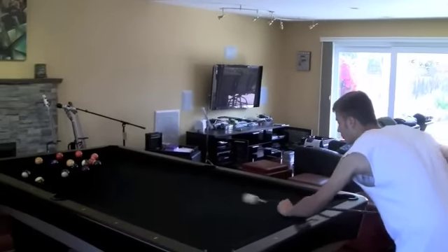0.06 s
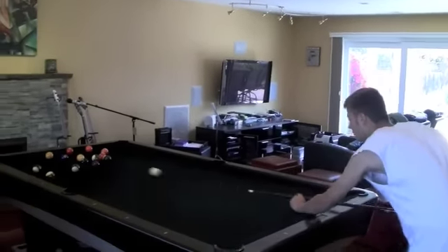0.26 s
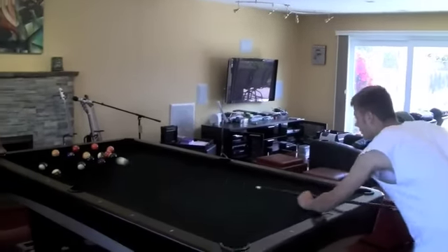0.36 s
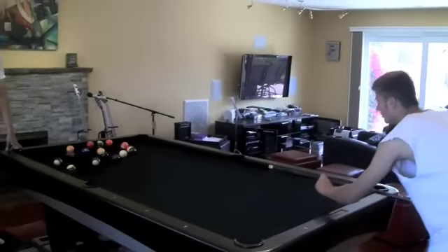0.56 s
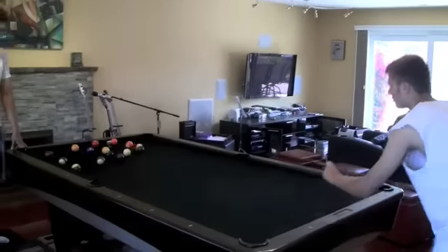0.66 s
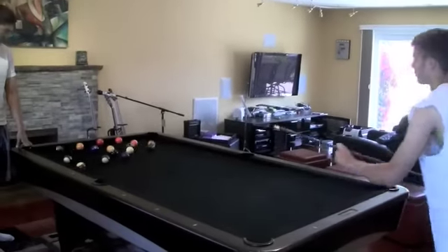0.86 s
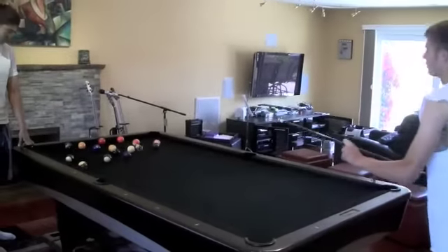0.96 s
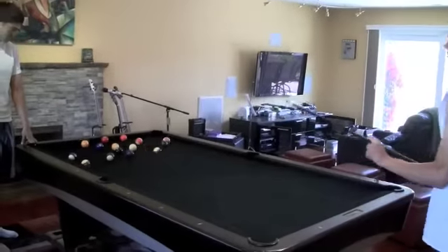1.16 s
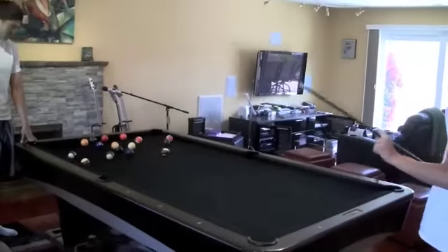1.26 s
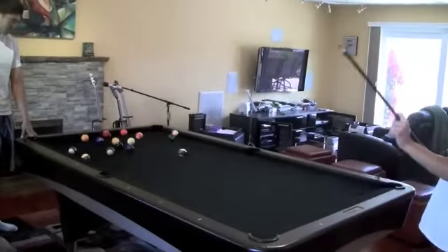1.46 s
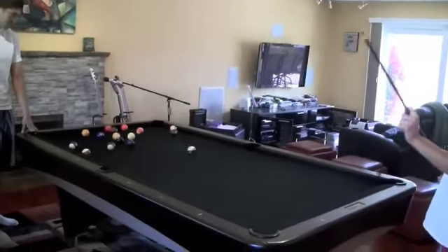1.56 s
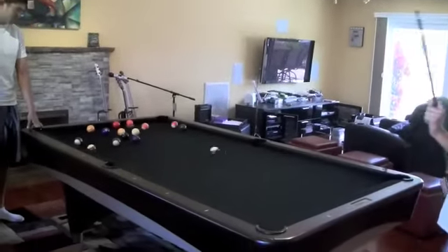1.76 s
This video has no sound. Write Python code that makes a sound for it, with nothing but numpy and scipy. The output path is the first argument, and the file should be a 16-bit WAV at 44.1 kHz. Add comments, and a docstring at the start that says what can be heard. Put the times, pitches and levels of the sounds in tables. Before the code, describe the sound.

A pool break in a reverberant living room, a few metres from the microphone. After faint room tone, a woody cue knock with a short throbbing shaft ring at 0.23 s. Low rolling follows. At 0.59 s a loud, hard crack of balls, with tight clacks thinning out by 0.75 s. Dull cushion thuds fade by 1.1 s; quiet hiss, then a small click at 1.57 s.

```python
"""A knock of wood, a crack of hard balls, dull thuds and one late click, in a lively living room.
A cue drives the white ball up a pool table, a few metres from the microphone.
The cue is a shaped blow, dense noise reflections and shaft modes; balls and cushions are jolted resonances.
Balls rumble over the slate, room tone and hiss lie beneath, and a limiter holds down the loud blows."""
import sys
import numpy as np
from scipy import signal
from scipy.io import wavfile
from scipy.ndimage import uniform_filter1d

SR = 44100
rng = np.random.default_rng(int(sys.argv[2]) if len(sys.argv) > 2 else 0)


def generate_wav(signal):
    """Clip the signal to [-1, 1] and save it as 16-bit WAV at the path in sys.argv[1]."""
    frames = np.transpose(np.atleast_2d(signal))
    scaled = np.clip(frames, -1, 1) * 32767
    pcm = np.round(scaled).astype(np.int16)
    wavfile.write(sys.argv[1], SR, pcm)


def decibels_to_gain(level_db):
    """Convert a level in decibels to a linear amplitude gain (20 dB per decade)."""
    exponent = np.asarray(level_db, float) / 20
    return 10 ** exponent


N = 79380  # length [samples]

# Knock of the tip: (frequency [Hz], level [dB])
TIP_COLOUR = [(60, -41.5), (150, -16), (300, -3), (600, -3), (1000, -2.5), (1500, -5.5), (3000, -14.5),
              (5000, -21.5), (9000, -31), (16000, -50)]
# Bright ticks of the tip and their echo: (time after the blow [ms], level [dB])
TIP_TICKS = [(.6, -9.5), (1.9, -15.5), (16.5, -16)]
# Ringing modes of the cue shaft: (frequency [Hz], level [dB], decay by 60 dB [s])
SHAFT_MODES = [(306, -34, 1), (864, -10.5, 0.04), (1384, -13, .25), (1734, -20.5, 0.36), (1985, -23, 0.64),
               (2870, -28.5, 0.36), (3060, -36, 0.49), (4365, -30.5, 0.26), (5250, -35.5, .4)]
# The long-ringing shaft mode, split in three: (frequency [Hz], relative level [dB])
SPLIT_MODE = [(1108, -7), (1121.5, 0), (1135, -7)]
# Ball on ball: (time [s], level [dB], contact [ms], treble snap [dB], ceiling echo delay [ms])
BALL_CLACKS = [(0.5894, 8, 0.35, -25.5, 7.4), (0.5902, 5.5, 0.3, -42.5, 9.4),
               (0.5914, 4.5, 0.46, -45.5, 15), (0.5935, 5, 0.34, -49.5, 9.2), (.603, 1, .38, -50.5, 7),
               (0.6042, -0.5, .38, -45, 5.4), (0.626, 4, .33, -43, 8), (.645, -7.5, .34, -45.5, 7.4),
               (.715, -7, 0.41, -40, 5.9), (0.746, -9.5, 0.38, -46, 9.1), (1.572, -12, 0.53, -28.5, 6.6)]
# First echoes off cloth and rails: (delay [ms], level before the factor [dB], factor)
TABLE_ECHOES = [(2.0, -7, 0.72), (3.1, 3.5, 0.49), (4.4, -8.5, 0.38)]
# Balls on cushions: (time [s], level [dB], resonance [Hz])
CUSHION_THUDS = [(.60, -36, 298), (0.679, -27, 300), (0.776, -22.5, 276), (.82, -26, 250.6),
                 (0.849, -24, 399.2), (0.894, -27.5, 369.6), (.928, -21, 329), (.965, -31.5, 187.8),
                 (1.0, -34, 340), (1.04, -39.5, 248.7), (1.124, -41.5, 348.8)]
# Balls rolling on the slate: (time [s], level [dB])
ROLL_LEVEL = [(.25, -63), (.3, -41.5), (.52, -44.5), (.63, -45), (.72, -43), (.98, -41), (1.1, -59.5),
              (1.751, -60.5)]
# Spectrum of the rolling rumble: (frequency [Hz], relative level [dB])
ROLL_COLOUR = [(25, -28), (50, -20.5), (80, -0.5), (140, -3.5), (250, -5.5), (500, -26.5), (1000, -65.5)]
# Spectrum of the room tone: (frequency [Hz], relative level [dB])
HUSH_COLOUR = [(15, -35.5), (25, -12.5), (114, -8.5), (202, -8), (280, -2), (457, -7.5), (787, -9.5),
               (854, -10), (3150, -24), (15200, -33.5), (16500, -46)]
# Stereo side against mid in the room tone: (frequency [Hz], level [dB])
HUSH_WIDTH = [(60, -15), (240, 5), (950, 1), (3770, -3.5), (15000, 1)]
# Decay of the living room: (frequency [Hz], decay by 60 dB [s])
ROOM_DECAY = [(100, 0.57), (260, 0.9), (700, 0.81), (1800, 0.72), (4800, 0.58), (8000, 0.47), (13000, 0.45)]
# Spectrum of the room's ring at its start: (frequency [Hz], relative level [dB])
ROOM_COLOUR = [(100, 8.5), (500, 2), (1500, 2.5), (3000, -2), (5000, 1.5), (8000, 2.5), (13000, -1.5),
               (16000, -6)]
# Stereo side against mid in the room's ring, the tip's reflections and rolling: (frequency [Hz], level [dB])
ROOM_WIDTH = [(60, -43.5), (180, -20), (550, -14.5), (1650, -11), (4970, -4), (15000, 4)]


def tip_blow():
    """The tip's blow: a minimum-phase pulse with the colour of the knock, energy 1."""
    log_gain = np.log(decibels_to_gain(read(TIP_COLOUR, abs(np.fft.fftfreq(4096, 1 / SR)))))
    spectrum = np.exp(np.conj(signal.hilbert(log_gain)))
    return unit(np.fft.ifft(spectrum).real[:2048])


def tip_reflections(t):
    """Dense early reflections of the knock: noise that dies away evenly in dB."""
    start_db, t60_s, low_hz = -13, 0.12, 556
    reflections = noise(len(t), lambda hz, s: read(TIP_COLOUR, hz) + 0 * s, ROOM_WIDTH)
    reflections = high(reflections, low_hz)
    return reflections / reflections.std() * decibels_to_gain(start_db - 60 * t / t60_s)


def shaft_ring(t):
    """Decaying modes of the shaft; the three parts of the split mode beat, so it throbs."""
    split_db, split_t60_s = -10.5, 0.6
    swell_s = 0.017  # the three parts first line up this long after the blow
    ring = sum(decibels_to_gain(db - 60 * t / t60_s) * np.sin(2 * np.pi * hz * t) for hz, db, t60_s in SHAFT_MODES)
    throb = sum(decibels_to_gain(db) * np.sin(2 * np.pi * hz * (t - swell_s)) for hz, db in SPLIT_MODE)
    return ring + decibels_to_gain(split_db - 60 * t / split_t60_s) * throb


def tip_tick(db):
    """A bright tick: a very short burst of noise, separate in each channel."""
    decay_s, low_hz = 0.0001, 4000
    t = np.arange(400) / SR
    burst = rng.standard_normal((2, 400)) * np.exp(-t / decay_s)
    return decibels_to_gain(db) * high(burst, low_hz)


def cue():
    """The tip's blow fills the room with its early reflections; the tip ticks and the shaft rings."""
    blow_db, wet_db, pan_db, rise_s = -5, 22, -2, 0.001
    t = np.arange(SR // 2) / SR
    out = in_room(decibels_to_gain(blow_db) * tip_blow(), wet_db, 0)
    after_blow = tip_reflections(t) + shaft_ring(t)
    out[:, :len(t)] += after_blow * np.minimum(t / rise_s, 1)
    for ms, db in TIP_TICKS:
        add(out, ms / 1000, tip_tick(db))
    return pan(out, pan_db)


def clack(db, contact_ms, snap_db, ceiling_ms):
    """Two hard balls meet: the air shoved by a jolted sphere plus a thin bright snap."""
    pan_db = -1.95
    body = jolt(contact_ms / 1000, hz=2013, width_hz=1194)
    body = high(body, 590)  # a small ball sends out little bass
    snap = decibels_to_gain(snap_db) * high(signal.unit_impulse(2048, 4), 6400, order=4)
    echoes = TABLE_ECHOES + [(ceiling_ms, 0.5, 1)]  # the ceiling returns the body at 0.5 dB
    body_in_room = in_room(body, 4.5, pan_db, echoes)
    snap_in_room = in_room(snap, 13, pan_db)
    return decibels_to_gain(db) * (body_in_room + snap_in_room)


def thud(db, hz):
    """A ball meets a cushion: a contact of half a period jolts a low, damped resonance."""
    body = high(jolt(0.5 / hz, hz, width_hz=70), 129)
    return in_room(decibels_to_gain(db) * body, wet_db=-5, pan_db=-1.5)


def jolt(contact_s, hz, width_hz):
    """A rounded contact force shakes a damped resonance; peak 1."""
    t = np.arange(2048) / SR
    force = np.sin(np.pi * np.clip(t / contact_s, 0, 1)) ** 2
    ring = np.exp(-np.pi * width_hz * t) * np.sin(2 * np.pi * hz * t)
    out = -np.gradient(np.convolve(force, ring)[:2048])
    return out / abs(out).max()


def in_room(x, wet_db, pan_db, echoes=()):
    """Direct sound, first echoes, and a diffuse ring that builds up and dies by band."""
    build_s = 0.01
    t = np.arange(SR) / SR
    tail = noise(SR, lambda hz, s: read(ROOM_COLOUR, hz) - 60 * s / read(ROOM_DECAY, hz), ROOM_WIDTH)
    path = decibels_to_gain(wet_db) * unit(tail * (1 - np.exp(-t / build_s)))
    for ms, db, factor in [(0, 0, 1), *echoes]:  # the first is the direct sound
        path[:, round(ms * SR / 1000)] += factor * decibels_to_gain(db)
    return pan(signal.fftconvolve(x[None], path, axes=1), pan_db)


def rolling():
    """Low rumble of the table bed while balls travel: noise that follows the level table."""
    rumble = noise(N, lambda hz, t: read(ROLL_COLOUR, hz) + 0 * t, ROOM_WIDTH, order=11)
    s, db = np.transpose(ROLL_LEVEL)
    level_db = np.interp(np.arange(N) / SR, s, db, left=-120)
    return rumble / rumble.std() * decibels_to_gain(level_db)


def hush():
    """Room tone and microphone hiss: shaped noise, slightly patchy below the treble."""
    level_db, patch_db, patch_top_hz = -50.5, 1, 3000
    patches = rng.standard_normal((1025, N // 512 + 6))  # (frequency bins, frames) of the noise below
    patches = uniform_filter1d(uniform_filter1d(patches, 20, 0), 6, 1)
    patches *= patch_db / patches.std()
    out = noise(N, lambda hz, t: read(HUSH_COLOUR, hz) + patches * (hz < patch_top_hz), HUSH_WIDTH, order=11)
    return decibels_to_gain(level_db) * out / out.std()


def noise(size, field_db, side, order=9):
    """Mid and side noise with a level rule over Hz and s, as left and right; frames of 2 ** order samples."""
    hop = 2 ** order // 4
    frames, hz = size // hop + 6, np.fft.rfftfreq(4 * hop, 1 / SR)[:, None]
    real, imag = rng.standard_normal((frames, len(hz), 2, 2)).T
    z = (real + 1j * imag) * decibels_to_gain(field_db(hz, np.arange(frames) * hop / SR))
    spectra = [z[0], z[1] * decibels_to_gain(read(side, hz))]
    mid, wide = signal.istft(spectra, nperseg=4 * hop, noverlap=3 * hop)[1][:, :size]
    return np.array([mid + wide, mid - wide])


def read(points, hz):
    """Table value on a log-frequency axis."""
    f, value = np.transpose(points)
    return np.interp(np.log(hz + 1), np.log(f + 1), value)


def high(x, hz, order=2):
    """Butterworth high-pass."""
    return signal.lfilter(*signal.butter(order, hz, "high", fs=SR), x)


def unit(x):
    """Scales to energy 1, averaged over the channels."""
    return x / np.sqrt(np.sum(x ** 2) / np.atleast_2d(x).shape[0])


def pan(x, pan_db):
    """Sets left over right by pan_db, half on each channel; negative leans right."""
    return x * decibels_to_gain(np.array([[pan_db], [-pan_db]]) / 2)


def add(mix, s, sound):
    """Mixes a two-channel sound in at time s."""
    part = mix[:, round(s * SR):][:, :sound.shape[1]]
    part += sound[:, :part.shape[1]]


def scene():
    """Cue, clacks and thuds in the room over rolling balls and room tone."""
    mix = hush() + rolling()
    add(mix, 0.2315, cue())
    for s, *blow in BALL_CLACKS:
        add(mix, s, clack(*blow))
    for s, db, hz in CUSHION_THUDS:
        add(mix, s, thud(db, hz))
    return mix


def microphone(x):
    """Microphone colour: the lowest bass is cut and a broad resonance is added."""
    low_hz, peak_hz, width_hz, added_db = 40, 2776, 785, -7
    x = high(x, low_hz)
    resonance = signal.lfilter(*signal.iirpeak(peak_hz, peak_hz / width_hz, SR), x)
    return x + decibels_to_gain(added_db) * resonance


def limiter(x):
    """Grabs within milliseconds and lets go at a steady dB rate; what it misses clips."""
    limit_db, share, ceiling = -14, 0.93, 0.95  # share of the excess dB that is taken off
    grab_s, recover_db_per_s = 0.0038, 164.5
    r = np.exp(-1 / (grab_s * SR))
    smooth = [1 - r], [1, -r]
    power_db = 10 * np.log10(signal.lfilter(*smooth, (x ** 2).mean(0)) + 1e-12)
    # hold each peak, then let it fall in a straight line
    fall_db = np.arange(N) * recover_db_per_s / SR
    held_db = np.maximum.accumulate(power_db + fall_db) - fall_db
    over_db = np.maximum(held_db - limit_db, 0)
    limited = x / decibels_to_gain(share * signal.lfilter(*smooth, over_db))
    return np.clip(limited, -ceiling, ceiling)


def roll_off(x):
    """The treble ends steeply here."""
    return signal.sosfilt(signal.butter(12, 16850, fs=SR, output="sos"), x)


def record(dry):
    """The scene through the microphone and its limiter."""
    mix = limiter(microphone(dry))
    return roll_off(mix)


dry = scene()
out = record(dry)
generate_wav(out)
```